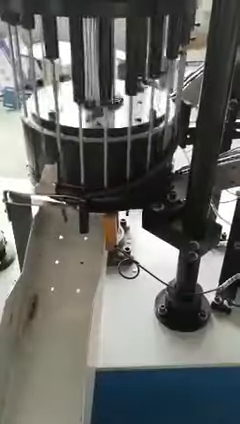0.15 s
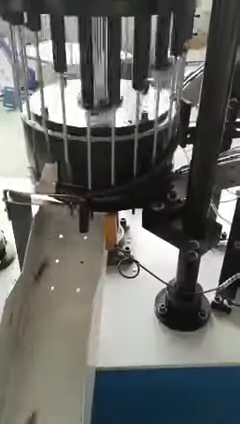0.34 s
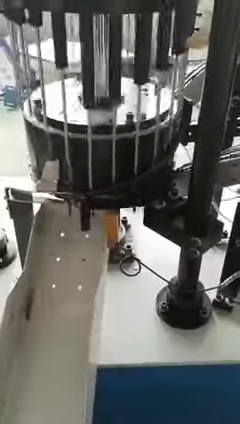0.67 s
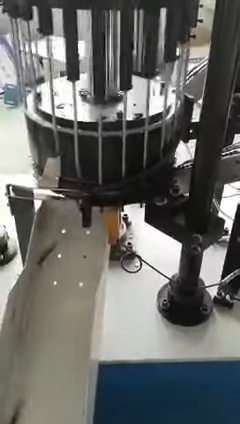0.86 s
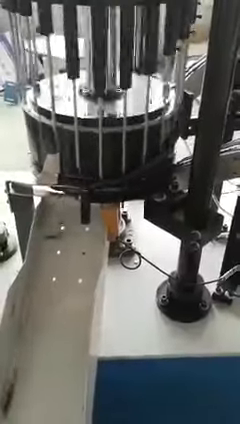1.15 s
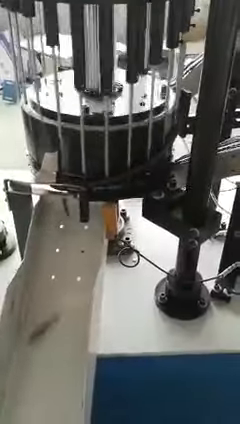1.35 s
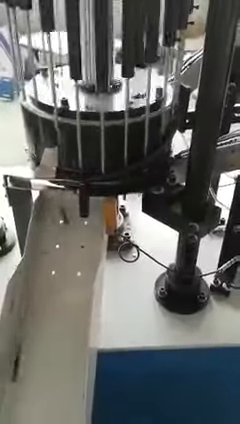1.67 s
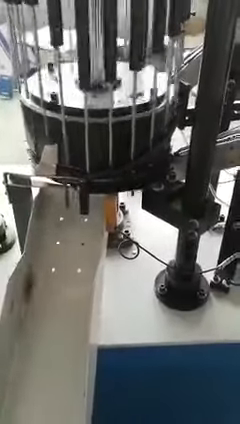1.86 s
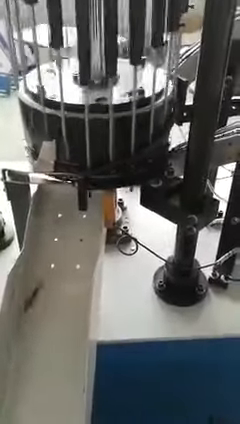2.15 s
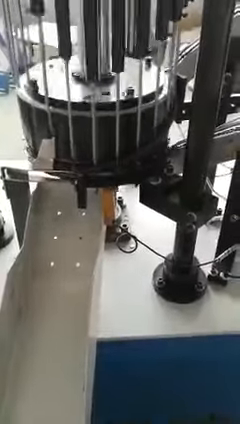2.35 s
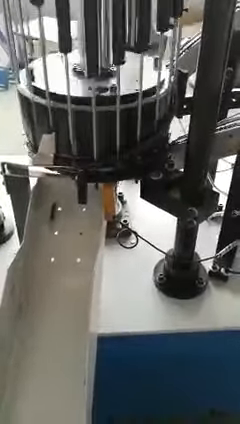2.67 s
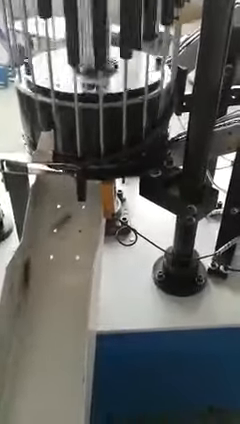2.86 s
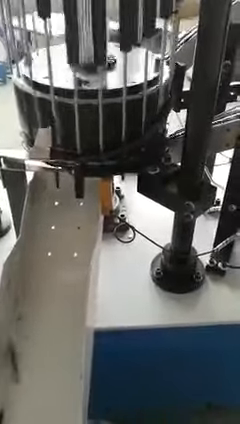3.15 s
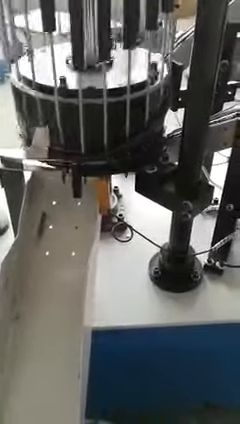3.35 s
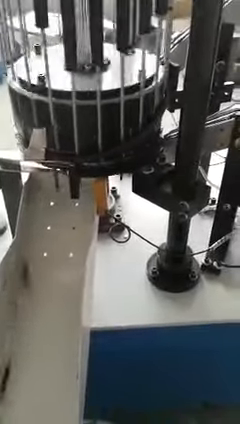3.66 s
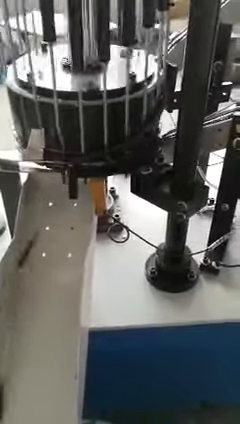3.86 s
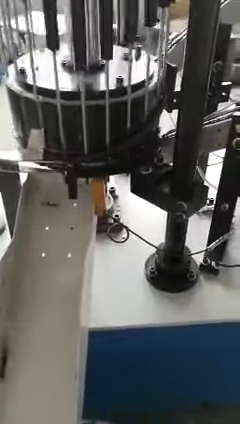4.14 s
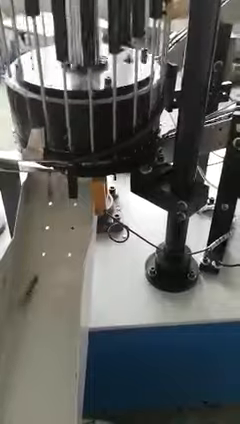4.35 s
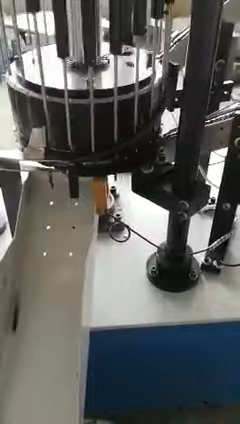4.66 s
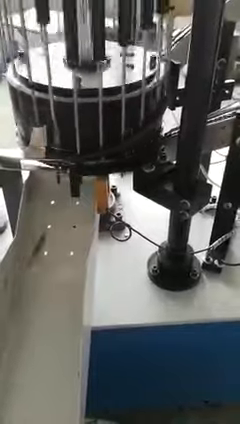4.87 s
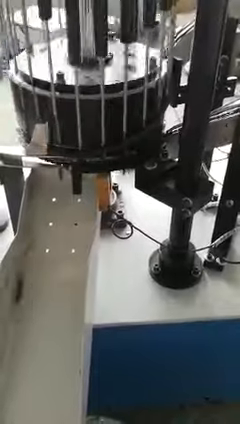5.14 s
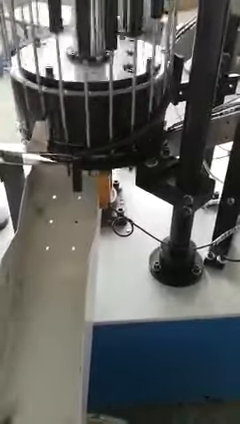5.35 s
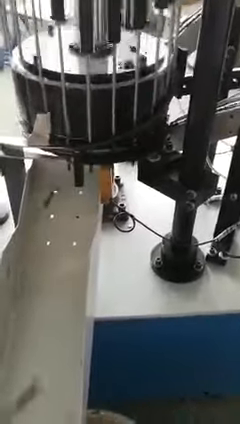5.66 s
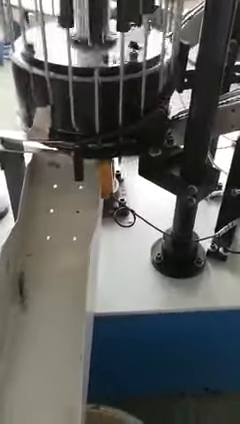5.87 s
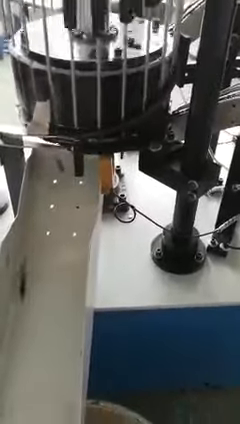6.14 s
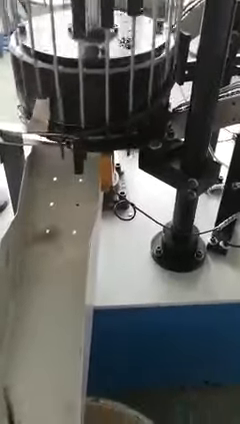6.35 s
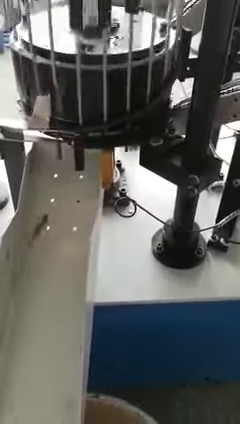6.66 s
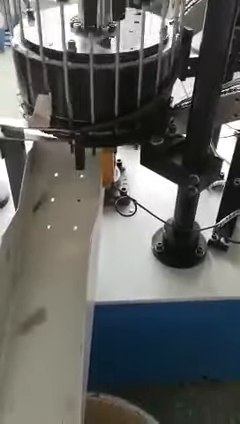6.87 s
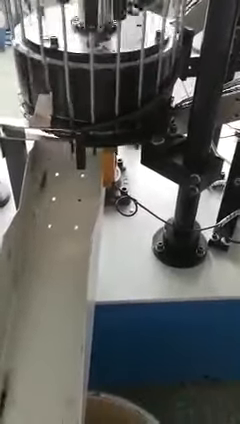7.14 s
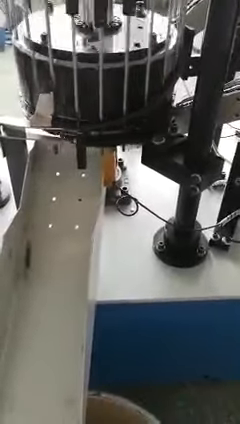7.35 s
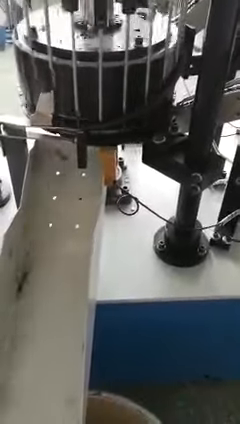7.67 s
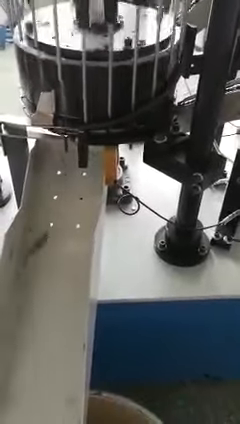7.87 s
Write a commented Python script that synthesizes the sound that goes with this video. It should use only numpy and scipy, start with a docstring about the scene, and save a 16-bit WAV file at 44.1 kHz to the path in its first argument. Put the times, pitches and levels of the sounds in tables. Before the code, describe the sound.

Air hiss and machine hum with a few knocks, then a vibrating steel feeder bowl takes over with bright, dense rattling of small plastic parts.

```python
"""Hissing air jets, mains hum and rumble of a factory hall are heard first, with knocks from a rotary table.
From about 1.2 to 1.6 s the vibrating steel feeder bowl comes to the fore: plastic parts excite its damped modes,
slide with a filtered-noise rustle and tap its rails. The jets and most hum lines recede while a broad din rises.
Knocks, dropped parts and a pinging steel piece are struck resonators; noise bands give air and rumble.
A few bumps on the microphone are heavily damped low swings."""
import sys
import numpy as np
from scipy import signal
from scipy.fft import rfft, irfft
from scipy.io import wavfile
from scipy.ndimage import uniform_filter1d

SR = 44100
rng = np.random.default_rng(int(sys.argv[2]) if len(sys.argv) > 2 else 0)


def to_wav(sig):
    """Store sig (one row per channel, or 1-D mono) as 16-bit WAV at the path in sys.argv[1].

    Samples outside -1..1 are clipped; the rate is SR.
    """
    pcm = np.clip(np.atleast_2d(sig), -1, 1) * 32767
    pcm = np.round(pcm).astype(np.int16)
    wavfile.write(sys.argv[1], SR, pcm.T)  # frames by channels


N = 352800
TIME = np.arange(N) / SR
PORT_LAG_S = .00034   # the feeder is off to the left, so its sound reaches the right port later
HALL_LAG_S = 0.17   # the hall's levels glide a little after the feeder's


# Load of parts on the track: t/s, level/dB
TRACK_LOAD = [(0, 0.5), (1.9, 0), (2.4, -0.15), (2.95, 1), (3.6, 0.5), (4.8, 0), (5.8, 0.2), (6.7, 0.84),
              (8, 0.5)]
# Rattle of the high modes, which comes in fits: t/s, level/dB before load and other changes
HIGH_CHATTER = [(0, -24.5), (1.24, -23), (1.3, -19), (1.43, -18.5), (1.49, -21), (1.56, -16.5),
                (2.4, -17.5), (3.9, -17.5), (4.5, -17.5), (5.2, -16.5), (6.7, -17), (8, -18.5)]
# Clumps of parts tumbling through the bowl: t/s of the crest,
# level change/dB of the ring near 1.75 kHz, of the other low modes, of the high modes
TUMBLES = [(1.81, 4.5, -1, 0), (2.05, 0.5, 0, 2.5), (2.22, 2.5, 4, 1), (2.31, 3.5, 0, -0.5),
           (2.74, 5.5, 1.5, 1), (3.07, 5, 2, -1), (3.47, -4, 1, 1), (3.59, -0.5, -1, 0),
           (3.80, 5.5, -0.5, -0.5), (4.29, 3.5, 0.5, 1), (4.53, -1, -1, 0), (4.75, -2, 0.5, 0),
           (4.92, 6, 2, -1), (5.12, -5, -0.5, 1.5), (5.47, 4, -1.5, 0.5), (5.71, 7, 2, 1),
           (5.84, 5.5, 1.5, 0.5), (6.18, 0, -2, 1.5), (6.67, 6, 0.5, -1), (6.52, 5, -1, -0.5),
           (6.9, 1, 1, -1), (7.2, 4.5, 0, -1), (7.33, 2, -0.5, 2), (7.54, -4, 0, 0.5), (7.63, -2, 0, 0.5)]


def chatter():
    """Level modulation: track load, a shifting heap and tumbling clumps add in dB to three drives."""
    heap_hz = 5.8
    load_db, = in_time(TRACK_LOAD)
    fits_db, = in_time(HIGH_CHATTER)
    low_db = handover((-26, -18.5)) + load_db + 0.44 * drift(heap_hz)
    brightening_db = 0.3163 * TIME   # the high modes slowly gain
    high_db = fits_db + brightening_db + load_db + 0.5 * drift(heap_hz)
    clumps_db = sum(np.outer(changes_db, swell(s, width_s=0.029)) for s, *changes_db in TUMBLES)
    return np.array([low_db, low_db, high_db]) + clumps_db


def feeder():
    """Superposition: bowl modes, sliding rustle, rail taps and rail notes share the chatter's drive."""
    ring_db, low_db, high_db = chatter()
    drives_db = [low_db + 19, ring_db + 18, low_db + 19, high_db + 14]
    modes = bowl(drives_db, evenness=(0.25, 0.46, 0.3, 0.48), top_hz=8190)
    rustle = flutter(sliding(per_s=900, hiss=0.28), depth_db=2.5, rate_hz=22)
    taps = track_ticks(per_s=220, hz=7780, t60=0.0076, pan_db=2.5, top_hz=8300)
    notes = rails(per_s=6, t60=0.23, force_db=3, count=30)
    out = modes + from_db((low_db + high_db) / 2 - 5) * rustle
    out += from_db(high_db - 9) * taps
    return out + from_db(low_db - 8.5) * notes


# Modes of the steel bowl and track: f/Hz, bandwidth/Hz, level/dB before the drive,
# left-right difference/dB before its limit of 7, phase lead of the left/rad
BOWL_MODES = [(901, 12, -46, 6, 2), (1011.7, 16, -41.5, 5, 2), (1133, 14, -46.5, -2, 1.6),
              (1196, 120, -42.5, -1, 1.7), (1391, 19, -43, -5.5, -4), (1448, 9.8, -40, 2.5, -1.5),
              (1532, 12, -38.5, -5.5, -2.5), (1630, 9.8, -43.5, 9, -1), (1709, 17, -33.5, -5, -0.5),
              (1804, 10.4, -36, 9, 0.2), (1900, 7.8, -37.5, -1, 0.5), (2007, 86, -35.5, 0.5, -0.5),
              (2272, 28, -31, -4.5, 3.5), (2348, 20, -43, 7, 6.5), (2450, 13, -35.5, -9, 3.5),
              (2685, 15, -34, -4, 0.5), (2880, 75, -32, -4.5, -1.14), (3170, 160, -37, 2, 1),
              (3353, 70, -35.5, -4, 1), (3790, 84, -35.5, -4, 1), (4260, 47, -38.5, -6, 1.5),
              (4374, 30, -38.5, -9, 4.5), (4810, 160, -30, -3, -2.5), (5546, 120, -30, -8.5, 0),
              (5917, 120, -26, -10, -1), (6396, 22, -27.5, -9, 0.5), (6360, 33, -29, 2, 2.5),
              (7220, 23, -30, 1, -5), (6970, 63, -25.5, -0.5, 1.5), (7634, 51, -18, 1, -2.5),
              (7747, 110, -23.5, 1, 0), (7935, 65, -19.5, 3.5, -1.5)]


def bowl(drives_db, evenness, top_hz):
    """Modal synthesis: random landings excite narrow resonances, driven in four frequency groups."""
    group_edges_hz = (1600, 1950, 5200)
    out, drives = np.zeros((2, N)), from_db(drives_db)
    for hz, width_hz, mode_db, pan_db, phase in BOWL_MODES:
        group = np.searchsorted(group_edges_hz, hz)
        force = contacts(per_s=2000, bunching=0.073, stray=0.91)
        r, w = np.exp(-np.pi * width_hz / SR), 2 * np.pi * hz / SR
        mode = rms_one(signal.lfilter([1, 0, -1], [1, -2 * r * np.cos(w), r * r], force + 1e-18))
        # evenness 0 leaves the mode's own fluctuation, 1 would flatten its short-term power
        power = uniform_filter1d(np.mean(mode ** 2, axis=0), size=3000) + .01
        mode = rms_one(mode / power ** (evenness[group] / 2))
        lag = phase / (2 * np.pi * hz)
        out += drives[group] * from_db(mode_db) * place(mode, pan_db, lag)
    return signal.sosfilt(signal.butter(10, top_hz, fs=SR, output="sos"), out)


# Spectrum of parts sliding along the track: f/Hz, relative level/dB per Hz
SLIDE_SPECTRUM = [(700, -35), (1250, -45), (1550, -5), (2700, -13), (4000, -9), (5800, -1.5), (6700, -19.5),
                  (7500, 0), (8200, -26), (9400, -7), (10000, -24.5), (11000, -11.5), (12500, -36),
                  (15000, -33.5)]


def sliding(per_s, hiss):
    """Friction as a dense train of impulses: dry plastic ticks and noise, echoing inside the machine."""
    ticks = contacts(per_s, bunching=0.065, stray=5.6, wander_db=1.5)
    source = rms_one(ticks) + hiss * rng.standard_normal((2, N))
    return enclosure(colour(source, SLIDE_SPECTRUM, PORT_LAG_S), t60=0.087, wet=1.0)


def track_ticks(per_s, hz, t60, pan_db, top_hz):
    """Impact excitation: parts tap the near rail, each a sudden bright ring of a few milliseconds."""
    taps = ring(contacts(per_s, bunching=0.18, stray=0.52, wander_db=2.0), hz, t60)
    taps = signal.sosfilt(signal.butter(6, top_hz, fs=SR, output="sos"), taps)
    return place(rms_one(taps), pan_db, PORT_LAG_S)


def rails(per_s, t60, force_db, count):
    """Random (Poisson-like) excitation: parts strike thin guide rails, each with a note of its own."""
    out = np.zeros((2, N))
    notes_hz = np.geomspace(2891, 6506, count)
    for hz, (detune, pan) in zip(notes_hz, rng.uniform(-1, 1, (count, 2))):
        at = np.flatnonzero(rng.random(N) < per_s / SR)
        force = np.zeros(N)
        force[at] = from_db(force_db * rng.uniform(-1.1, 1, len(at)))
        note = ring(force, hz * (1 + 0.0092 * detune), t60)
        out += place([note, note], 6 * pan, PORT_LAG_S)
    return rms_one(out)


def contacts(per_s, bunching, stray, wander_db=0):
    """Impulse train: random stereo clicks whose force varies with each shake, slowly, and by side."""
    shake_hz = 100
    at = np.flatnonzero(rng.random(N) < per_s / SR)
    stroke = np.sqrt(1 + bunching * np.cos(2 * np.pi * shake_hz * TIME[at]))
    size = rng.choice([-1, 1], len(at)) * stroke * from_db(wander_db * drift(7.9)[at])
    force = np.zeros((2, N))
    force[:, at] = size * (1 + stray * rng.standard_normal((2, len(at))))
    return force


# Station knocks: t/s, relative level/dB of the frame's ring, relative level/dB of the tool's clack
KNOCKS = [(0.248, -27.5, -24), (0.428, -21.5, -23), (0.492, -32, -22), (0.62, -25, -30), (0.796, -23, -12),
          (1.106, -21, -21), (1.402, -25.5, -28)]
# Modes of the table frame: f/Hz, relative level/dB, t60/s
FRAME_MODES = [(788, -9.5, 0.28), (1480, -8, .1), (1547, -4, 0.4), (1566, -6.5, 0.22), (2590, -7, 0.21),
               (4470, -0.5, .15), (5700, 4, .09)]
# Spectrum of a tool's clack: f/Hz, relative level/dB per Hz
CLACK_SPECTRUM = [(500, -30.5), (1500, -8), (3000, -8), (5500, 1), (7600, 8), (9000, -15), (15000, -26)]


def stations(ring_db, clack_db, clack_s):
    """Impact and modal decay: a tool lands with a short noise burst and leaves the table frame ringing."""
    s, frame_db, tool_db = np.transpose(KNOCKS)
    frame = sum(ring(clicks(s, frame_db + mode_db), hz, t60) for hz, mode_db, t60 in FRAME_MODES)
    decay = np.exp(-1 / (clack_s * SR))
    envelope = signal.lfilter([1], [1, -decay], clicks(s, tool_db) + 1e-18)
    clack = envelope * colour(rng.standard_normal((2, N)), CLACK_SPECTRUM, PORT_LAG_S / 2)
    return from_db(ring_db) * frame + from_db(clack_db) * clack


# Dropped single parts: t/s, level/dB, f/Hz
DROPS = [(0.633, -16, 2060), (0.7915, -10, 2010), (1.123, -11, 2100), (1.246, -12, 2580),
         (1.632, -11, 2050), (2.2, -15, 2920)]


def drops(t60):
    """Damped free vibration: a dropped part gives a short hollow tick at its own pitch."""
    return sum(ring(clicks([s], [level_db]), hz, t60) for s, level_db, hz in DROPS)


# Pings of a steel piece: t/s, level/dB before the overall ping level
PINGS = [(1.244, -24), (1.644, -20), (1.915, -22), (2.065, -28), (2.18, -24), (2.305, -19), (2.559, -25),
         (2.666, -22), (2.995, -22), (3.318, -21.5), (3.54, -28), (3.715, -20), (3.825, -18), (4.002, -15),
         (4.145, -25), (4.23, -25), (4.445, -18), (4.545, -22), (4.705, -21), (4.873, -19.5), (4.985, -25),
         (5.243, -22), (5.456, -18), (5.616, -25), (5.797, -19), (5.962, -28), (6.022, -23), (6.325, -24),
         (7.046, -21), (7.51, -24), (7.639, -23)]


def pings(ping_db):
    """Lightly damped resonance: a steel piece rings on one note at every stroke."""
    return from_db(ping_db) * ring(clicks(*np.transpose(PINGS)), hz=2682, t60=.3)


# Bumps on the microphone: t/s, relative level/dB, signed factor (push or pull)
BUMPS = [(1.471, -17, -1.3), (1.766, -20, -0.81), (4.153, -27, 1), (6.176, -17, 0.67)]


def bumps(hz, t60):
    """Heavily damped oscillator: a touch on the microphone gives one low swing."""
    force = np.zeros(N)
    for s, bump_db, push in BUMPS:
        force[round(s * SR)] = push * from_db(bump_db)
    return ring(force, hz, t60)


# Spectrum of the hall's air jets: f/Hz, relative level/dB per Hz
JET_SPECTRUM = [(120, -45), (250, -20), (420, -14.5), (650, -13.5), (1020, -15.5), (1400, -10.5),
                (1750, -9), (2090, -2), (2290, -10), (2580, 5.5), (2750, 2.5), (3000, -6), (3300, -4.5),
                (4550, -3.5), (6190, -4), (7500, 3.5), (8300, -4), (10300, -17), (15000, -20)]


def air_jets():
    """Turbulent jet noise: coloured, flickering hiss that recedes as the feeder comes to the fore."""
    hiss = colour(rng.standard_normal((2, N)), JET_SPECTRUM, PORT_LAG_S / 2)
    return from_db(handover((-16.5, -38), HALL_LAG_S)) * flutter(hiss, depth_db=2.14, rate_hz=17)


# Spectrum of compressed air and far machines: f/Hz, relative level/dB per Hz
DIN_SPECTRUM = [(120, -38), (200, -10.5), (500, -12), (750, -9), (1200, -8), (1520, -4), (1700, -5),
                (2350, -0.5), (2600, 8), (3100, -3), (5000, -0.5), (7700, 4.5), (10000, -19), (15000, -10)]


def din():
    """Diffuse broadband noise: echoing hiss of air and far machines, rising and slowly wandering."""
    level_db = handover((-27, -23), HALL_LAG_S) + .5 * drift(2.2)
    hiss = colour(rng.standard_normal((2, N)), DIN_SPECTRUM, PORT_LAG_S / 2)
    return from_db(level_db) * flutter(enclosure(hiss, t60=0.15, wet=0.67), depth_db=3.0, rate_hz=10)


# Lines of feeder magnets and motors: f/Hz, mean level/dB while the hall is to the fore, after
HUM_LINES = [(50.4, -44.5, -52), (99.2, -41, -49), (131, -47.5, -55.5), (193.7, -47, -56.5),
             (300.4, -45, -56), (399.7, -52.5, -52.5), (499, -45, -56), (568, -50, -69), (606, -46, -61),
             (659, -42.5, -53), (749, -47, -51), (785, -45.5, -49.5), (952, -47.5, -65)]


def hum(waver_db, phase_wander):
    """Additive synthesis: wavering sine lines, with a phase between the sides set by their likeness."""
    out = np.zeros((2, N))
    for k, (hz, *levels_db) in enumerate(HUM_LINES):
        phase = 2 * np.pi * hz * TIME + phase_wander * drift(5.8)
        apart = np.arccos(at_hz(LIKENESS, hz)) * (-1) ** k
        level_db = handover(levels_db, HALL_LAG_S) + waver_db * drift(8.6)
        out += np.sqrt(2) * from_db(level_db) * np.sin([phase, phase + apart])
    return out


# Spectrum of the rumble: f/Hz, relative level/dB per Hz
RUMBLE_SPECTRUM = [(12, -41), (20, -26), (38, 5.5), (86, 5.5), (136, 6), (265, -10.5), (300, -19),
                   (390, -54), (660, -120)]
# Course of the rumble: t/s, relative level/dB
RUMBLE_LEVEL = [(0, -34), (.33, -31.5), (.95, -30.5), (1.15, -34.5), (1.45, -37), (1.85, -43), (2.5, -46),
                (2.75, -44), (2.93, -35), (3.2, -39), (3.6, -44), (6.5, -40.5), (6.67, -38.5), (6.9, -44),
                (7.7, -41.5), (7.88, -38), (8, -43)]


def rumble():
    """Low-frequency random noise: a coloured band swells and sinks with its level curve."""
    level_db, = in_time(RUMBLE_LEVEL)
    return from_db(level_db - 2.5) * colour(rng.standard_normal((2, N)), RUMBLE_SPECTRUM)


def ring(force, hz, t60):
    """Damped resonator: a unit click sets a sine of about height 1 ringing."""
    r, w = from_db(-60 / (t60 * SR)), 2 * np.pi * hz / SR
    return signal.lfilter([0, np.sin(w)], [1, -2 * r * np.cos(w), r * r], force + 1e-18)


def clicks(times, levels_db):
    """Impulse excitation: one click at each time."""
    force = np.zeros(N)
    force[np.round(np.array(times) * SR).astype(int)] = from_db(levels_db)
    return force


def place(pair, pan_db, lag):
    """Interaural-style cues: a level difference, and a delay of the right side by lag seconds."""
    gain = from_db(np.clip(pan_db, -7, 7) / 2)
    return np.array([pair[0] * gain, np.roll(pair[1], round(lag * SR)) / gain])


def enclosure(pair, t60, wet):
    """Reverberation: dense decaying echoes carve fine peaks and notches, other ones on each side."""
    t = TIME[:SR // 5]
    echoes = rng.standard_normal((2, len(t))) * from_db(-60 * t / t60)
    echoes /= np.linalg.norm(echoes, axis=1, keepdims=True)
    return rms_one(pair + wet * signal.oaconvolve(pair, echoes, axes=1)[:, :N])


# Coherence of the diffuse sound: f/Hz, left-right likeness (1 alike, -1 opposite)
LIKENESS = [(60, 0.97), (130, 0.97), (290, 0.51), (640, -0.82), (1400, 0.88), (15000, -0.44)]


def colour(pair, spectrum, lag=0):
    """Spectral shaping and coherence: two unrelated signals become a partly diffuse pair of rms 1."""
    hz = np.maximum(np.arange(N // 2 + 1) * SR / N, 1)
    alike = at_hz(LIKENESS, hz)
    mid, side = rfft(pair) * from_db(at_hz(spectrum, hz))
    ports = np.sqrt(1 + alike) * mid + np.sqrt(1 - alike) * side * [[1], [-1]]
    ports[1] *= np.exp(-2j * np.pi * hz * lag)   # delays the right port
    return rms_one(irfft(ports, N))


def flutter(pair, depth_db, rate_hz):
    """Band-wise amplitude modulation: third-octave bands above 2 kHz flicker independently."""
    spectrum, out = rfft(pair), 0
    hz = np.maximum(np.arange(N // 2 + 1) * SR / N, 1)
    band = np.clip(3 * np.log2(hz / 2000), 0, 8)   # the end bands take all that lies beyond
    for k in range(9):
        part = irfft(spectrum * np.maximum(1 - abs(band - k), 0), N)
        out = out + part * from_db(depth_db * drift(rate_hz))
    return rms_one(out)


def handover(levels_db, lag_s=0):
    """Linear crossfade of gain: a level in dB glides from its first value to its second."""
    start_s, length_s = 1.195, 0.38
    before_db, after_db = levels_db
    share = np.clip((TIME - start_s - lag_s) / length_s, 0, 1)
    return 20 * np.log10(from_db(before_db) * (1 - share) + from_db(after_db) * share)


def swell(s, width_s):
    """Gaussian envelope: a bell-shaped rise and fall of height 1."""
    return np.exp(-.5 * ((TIME - s) / width_s) ** 2)


def drift(rate_hz):
    """Low-pass filtered noise: a smooth random wander of spread 1."""
    step = 40   # samples between computed points
    r = np.exp(-2 * np.pi * step * rate_hz / SR)
    noise = rng.standard_normal(N // step + 2002)
    slow = signal.lfilter([1], [1, -2 * r, r * r], noise)[2000:]   # skips the settling time
    return np.interp(np.arange(N) / step, np.arange(len(slow)), rms_one(slow))


def from_db(db):
    """Logarithmic level: decibels to gain."""
    return 10 ** (np.asarray(db) / 20)


def rms_one(x):
    """Power normalisation: scale to an rms of 1."""
    return x / np.sqrt(np.mean(x ** 2) + 1e-20)


def in_time(rows):
    """Linear interpolation: each column of a curve at every sample."""
    s, *columns = np.transpose(rows)
    return [np.interp(TIME, s, c) for c in columns]


def at_hz(points, hz):
    """Interpolation on a log-frequency axis: read a spectrum at hz."""
    points_hz, values = np.transpose(points)
    return np.interp(np.log(hz), np.log(points_hz), values)


def scene():
    """Linear superposition: feeder, table and hall add, and the level dips briefly after the first bump."""
    table = stations(ring_db=-1, clack_db=1.0, clack_s=.014) + drops(t60=0.016) + pings(ping_db=-1.0)
    hall = air_jets() + din() + hum(waver_db=3.5, phase_wander=0.68) + rumble()
    dip = from_db(-2.8 * swell(1.495, width_s=0.016))
    return dip * (feeder() + table + hall) + from_db(11) * bumps(hz=69, t60=0.018)


def record(dry):
    """Soft saturation and band limiting: the highest peaks are rounded off, and the top is cut steeply."""
    rounded = dry / (1 + (dry / .95) ** 8) ** (1 / 8)
    return signal.sosfilt(signal.ellip(12, .1, 90, 15150, fs=SR, output="sos"), rounded)


dry = scene()
out = record(dry)
to_wav(out)
```